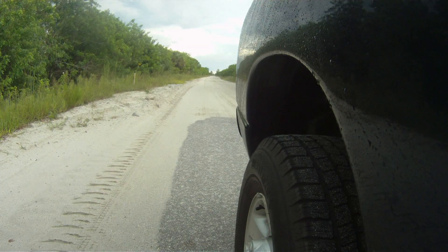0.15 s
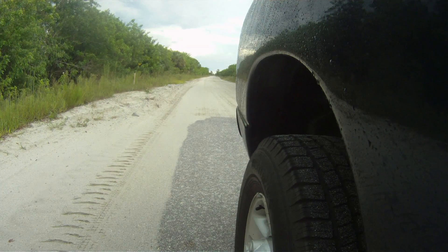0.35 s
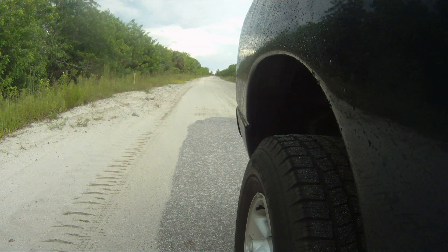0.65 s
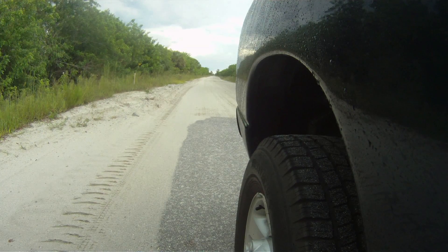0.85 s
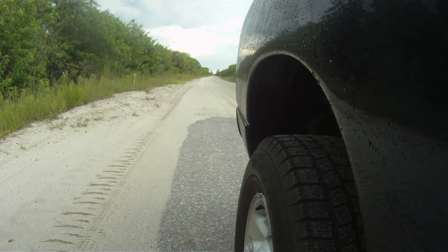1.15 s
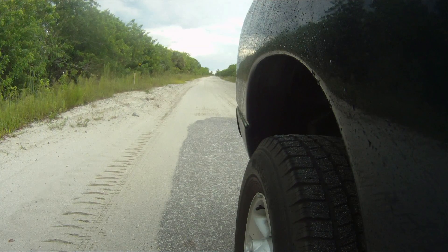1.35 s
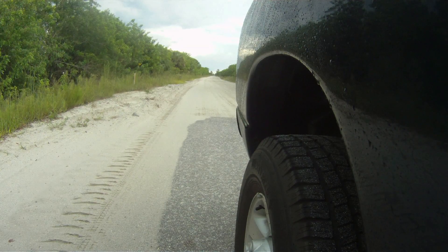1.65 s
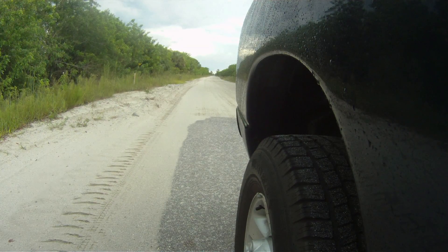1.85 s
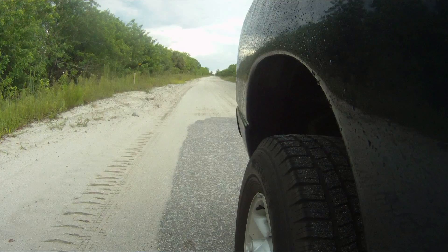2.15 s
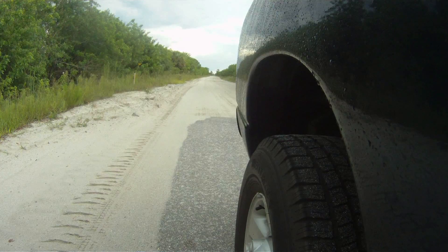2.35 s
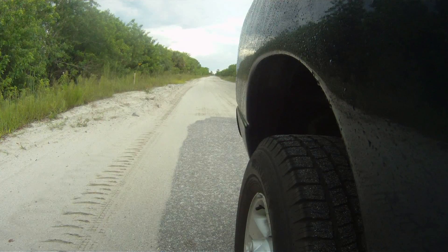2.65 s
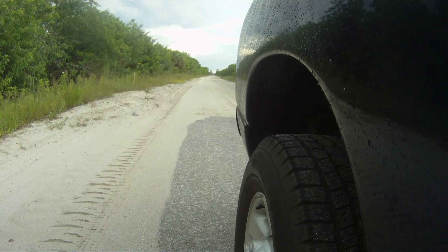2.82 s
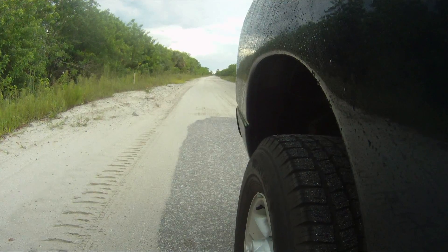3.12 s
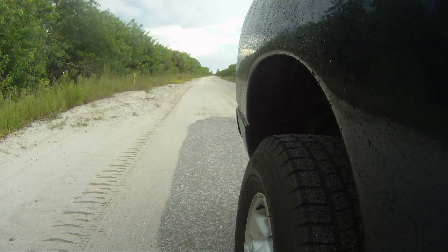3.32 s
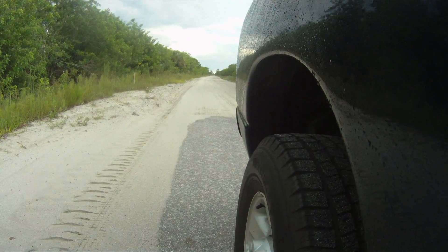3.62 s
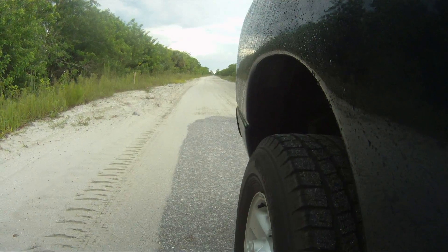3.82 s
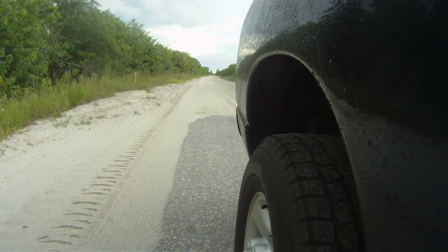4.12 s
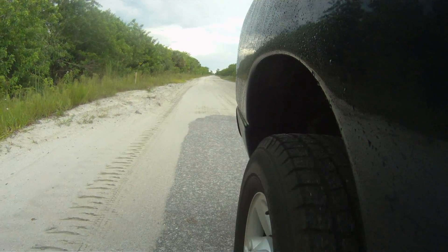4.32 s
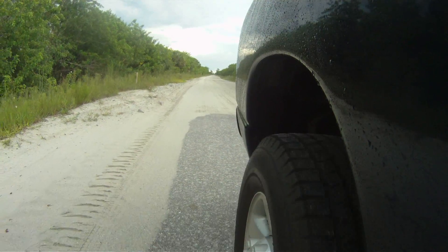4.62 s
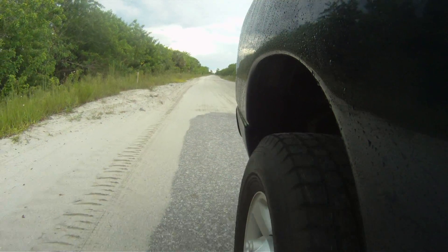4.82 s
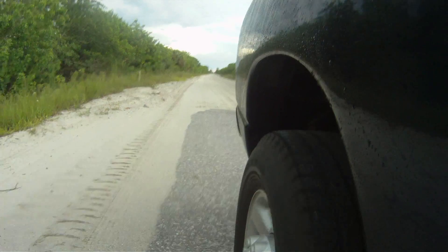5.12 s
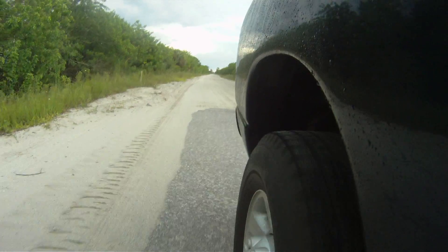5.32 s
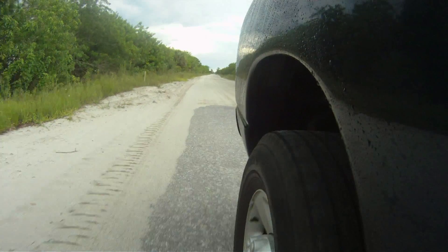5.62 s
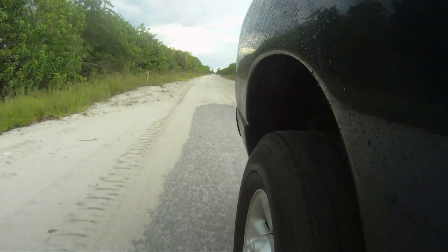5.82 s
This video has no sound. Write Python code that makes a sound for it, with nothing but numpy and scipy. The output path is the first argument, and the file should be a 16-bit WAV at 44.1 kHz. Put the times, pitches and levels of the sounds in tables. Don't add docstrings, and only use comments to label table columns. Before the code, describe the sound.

A six-cylinder diesel pickup idles on a rural road, with lumpy low exhaust and steady metallic knocking. Around three seconds a gear engages with soft deep thumps and a flurry of plastic ticks. The engine lugs, then revs up hard, booming loudly with a brief dip as the truck pulls away. The microphone sits close on the door panel in a closed housing, muffled and boxy with gritty highs.

```python
import sys
import numpy as np
from scipy import signal
from scipy.fft import rfft, irfft
from scipy.io import wavfile
from scipy.ndimage import uniform_filter1d

SR = 44100
rng = np.random.default_rng(int(sys.argv[2]) if len(sys.argv) > 2 else 0)


def linear_from_db(decibels):
    return 10 ** (np.asarray(decibels, float) / 20)


def persist_wave(psi):
    counts = np.round(np.clip(psi, -1, 1) * 32767).astype(np.int16)
    wavfile.write(sys.argv[1], SR, np.atleast_2d(counts).T)


N = 262836


def rms_one(x):
    return x / np.sqrt(np.mean(x ** 2) + 1e-20)


def in_time(rows):
    time_s, *columns = np.transpose(rows)
    return [np.interp(np.arange(N) / SR, time_s, column) for column in columns]


def drift(rate_hz, size=1):
    pole = np.exp(-80 * np.pi * rate_hz / SR)
    noise = rng.standard_normal(N // 40 + 2002)
    slow = signal.lfilter([1], [1, -2 * pole, pole ** 2], noise)[2000:]
    return np.interp(np.arange(0, N, size) / 40, np.arange(len(slow)), rms_one(slow))


def coloured_noise(spectrum):
    hz, level_db = np.transpose(spectrum)
    log_hz = np.log(np.arange(1, N // 2 + 2) * SR / N)
    gain = linear_from_db(np.interp(log_hz, np.log(hz), level_db))
    return rms_one(irfft(rfft(rng.standard_normal(N)) * gain, N))


def resonate(x, modes):
    out = 0
    for i, (hz, width_hz, level_db) in enumerate(modes):
        r = np.exp(-np.pi * width_hz / SR)
        poles = [1, -2 * r * np.cos(2 * np.pi * hz / SR), r * r]
        ringing = signal.lfilter([(1 - r * r) / 2, 0, (r * r - 1) / 2], poles, x)
        out = out + (-1) ** i * linear_from_db(level_db) * ringing
    return out


def sine(cycles, level_db):
    return np.sqrt(2) * linear_from_db(level_db) * np.cos(2 * np.pi * cycles)


def exhaust(cycle, speed_hz, rest_db):
    # time in seconds, level in dB rms.
    boom = [(0, -45), (1.5, -53), (2.35, -48), (2.6, -31), (3.15, -46), (3.3, -33), (3.45, -32),
            (4.2, -31.5), (4.5, -26), (4.72, -19.5), (4.82, -18), (4.87, -23.5), (4.96, -19.5),
            (5.1, -22.5), (5.22, -32), (5.36, -12.5), (5.55, -22), (5.68, -14)]
    # multiple of the cycle, level in dB at idle, in gear, throttle opening, full load.
    order_mix = [(3, 2.5, -11, -11, -8), (9, 6, -7, 8, -9), (10, 3, 0, -4, -11), (12, -12, 1.5, -9, 1),
                 (4, -15, -15, -16, -16), (4.5, -9, -9, -14, -14), (5, -20, -7, -13, -12),
                 (7, -14, -14, -22, -11), (8, -9, -20, -13, -25), (11, -10, -7, -14, -18),
                 (13, -18, -27, -14, -17), (14, -24, -23, -27, -22), (15, -14, -18, -5, -13),
                 (16, -15, -12, -15, -11), (17, -21, -20, -19, -20), (18, -8, -9, -8, -5),
                 (19, -16, -15, -10, -17), (20, -16, -17, -22, -19), (21, -5, -7, -13, -16),
                 (22, -23, -14, -18, -18), (24, -16, -12, -21, -13)]
    stage_s = [2.5, 3.2, 4.25, 4.45, 4.7, 4.9]
    # Hz, half width in Hz, level in dB.
    order_lifts = [(103.8, 6.2, 9), (189, 7.5, 2.5), (289.7, 6.6, 6.5), (348, 6.9, 3.5), (423, 27, -18)]
    # Hz, width in Hz, level in dB.
    door_panel = [(60.87, 1.95, 15.5)]
    start_cycles = -.22
    boom_db, = in_time(boom)
    firing = sine(6 * (cycle + start_cycles), boom_db)

    t = (np.arange(N) / SR)[::12]
    cycle, speed_hz, rest_db = cycle[::12], speed_hz[::12], rest_db[::12]
    high_orders = []
    for order in (23, *range(25, 34), *range(36, 55, 3)):
        base_db = -24 - 0.9 * (order - 24) + 11 * (order % 3 == 0)
        loaded_db = base_db + 6.5 * (order % 6 == 0)
        high_orders.append((order, base_db, base_db, base_db, loaded_db))
    others = np.zeros(len(t))
    for order, idle_db, gear_db, opening_db, full_db in list(order_mix) + high_orders:
        order = round(2 * order) / 2
        order_db = np.interp(t, stage_s, [idle_db, gear_db, gear_db, opening_db, opening_db, full_db])
        order_db = order_db + rest_db
        for hz, half_width_hz, lift_db in order_lifts:
            order_db += lift_db / (1 + ((order * speed_hz - hz) / half_width_hz) ** 2)
        if order in (3, 9, 10, 12):
            phase = order * start_cycles
        else:
            phase = rng.random() + .02 * drift(2, size=12)
            order_db += 2.2 * drift(6, size=12)
        others += sine(order * cycle + phase, order_db)
    return firing + resonate(firing, door_panel) + signal.resample_poly(others, 12, 1)[:N]


def knock(cycle, modes, cylinders_db, fall_db, steady, repeat, strike=0):
    firing = 6 * (cycle - .92 + 1)
    index = firing.astype(int)
    cylinder = index % 6
    strength_db = np.array(cylinders_db)[cylinder] + 1.1 * rng.standard_normal(400)[index]
    burst = linear_from_db(strength_db - fall_db * (firing - index)) + steady
    since_firing = np.arange(N) - np.searchsorted(index, index)
    pattern = rng.standard_normal((6, SR // 20))[cylinder, since_firing]
    grain = repeat * pattern + (1 - repeat) * rng.standard_normal(N)
    struck = grain + strike * (since_firing == 0)
    return resonate(rms_one(burst * struck), modes)


def clatter(cycle, knock_db, load_db):
    # Hz, width in Hz, level in dB.
    sump, pan, block = [(535.3, 14.4, -11), (656, 14.3, -16.5), (757, 14, -9.5), (820, 14, -11.5)], [(669, 18, 0)], [(958, 17.8, -5), (1034, 6.3, -3), (1094.4, 17.7, 2),
                                                   (1181.2, 15.4, -2.5), (1220.5, 11.4, -5.5),
                                                   (1490, 9, -18.5), (1708, 13.5, -16.5)]
    head, valves, injector = [(2203, 13.4, -10), (2299, 49, -11.5), (2438, 62, -8.5), (2600, 172, -18)], [(3030, 176, -26), (3650, 110, -24.5), (4350, 84, -36.5)], [(4590, 50, -30.5), (5034, 250, -30)]
    sump_cyl_db, block_cyl_db = [7, 0, -1, -4, -7, -6], [1, 0, -1, -1, 1, 0]
    head_cyl_db, valve_cyl_db = [-1, -2, -1, 3, 2, -1], [2, -1, 1, -1, 2, 0]
    injector_cyl_db = [5, 3.5, 0.5, -3, -1, -2]
    dull = knock(cycle, sump, sump_cyl_db, fall_db=4, steady=0.8, repeat=0.31)
    dull += knock(cycle, pan, sump_cyl_db, fall_db=6, steady=.3, repeat=.5, strike=32)
    dull += knock(cycle, block, block_cyl_db, fall_db=6, steady=0.64, repeat=0.17, strike=3.4)
    bright = knock(cycle, head, head_cyl_db, fall_db=3, steady=0.46, repeat=0.38)
    bright += knock(cycle, valves, valve_cyl_db, fall_db=2.5, steady=0.068, repeat=0.33)
    bright += knock(cycle, injector, injector_cyl_db, fall_db=3, steady=.05, repeat=.2)
    bright_db = 0.33 - 5.5 * np.tanh(load_db / 6.5)
    return linear_from_db(knock_db + 22.5) * (dull + linear_from_db(bright_db) * (bright + hiss()))


def jolts(rows, rise_db_s, fall_db_s):
    out = np.zeros(N)
    for crest_s, hz, level_db in rows:
        near = slice(int((crest_s - .3) * SR), int((crest_s + .5) * SR))
        t = np.arange(N)[near] / SR - crest_s
        out[near] += sine(hz * t, level_db - np.maximum(-rise_db_s * t, fall_db_s * t))
    return out


def gear_shudder():
    # crest in seconds, Hz, level in dB rms.
    cab = [(2.862, 41.8, -16), (2.988, 42.8, -17.5), (3.154, 40.9, -21.5), (3.26, 40.3, -28),
           (3.44, 39.5, -21.5), (2.94, 20.6, -17.5), (3.16, 20.4, -42)]
    # crest in seconds, Hz, level in dB rms.
    door = [(2.865, 50.6, -25), (2.988, 60.2, -14.5), (3.2, 63.7, -19.5), (3.39, 65, -47)]
    return jolts(cab, rise_db_s=176, fall_db_s=128) + jolts(door, rise_db_s=303, fall_db_s=106)


def door_drumming():
    # crest in seconds, Hz, level in dB rms.
    drumming = [(5.4, 61.6, -37), (5.62, 60.5, -19), (5.77, 53.6, -13.5), (5.87, 56, -14),
                (5.52, 30.5, -29), (5.67, 29, -34.5), (5.885, 28.5, -19)]
    return jolts(drumming, rise_db_s=100, fall_db_s=127)


def buzz(low):
    contact = uniform_filter1d(np.clip(low - 0.076, 0, .3), size=260)
    chatter = contact * rng.standard_normal(N)
    return linear_from_db(-21.5) * resonate(chatter, [(1680, 600, -14), (2970, 340, 11.0), (5450, 900, -2)])


def ticks():
    # time in seconds, peak in dB.
    clear_ticks = [(0.166, -28), (1.0355, -25), (1.4503, -22.5), (1.964, -25), (2.9028, -22.5),
                   (2.9472, -39), (2.9831, -36), (3.0076, -22), (3.0646, -23), (3.0824, -20), (3.1053, -29),
                   (3.1308, -22), (4.782, -28), (4.8324, -21), (4.89, -17), (4.9077, -23), (5.0235, -16),
                   (5.0404, -21), (5.187, -28), (3.0357, -37), (3.1787, -32)]
    faint_per_s, faint_db = 4, -42
    faint = rng.random(N) < faint_per_s / SR
    clicks = faint * linear_from_db(faint_db + 3 * rng.standard_normal(N)) + 1e-18
    for time_s, peak_db in clear_ticks:
        clicks[round(time_s * SR)] = linear_from_db(peak_db)
    rounded_edge = np.hanning(30) * np.cos(2 * np.pi * 3500 * np.arange(30) / SR)
    clicks = signal.lfilter(rounded_edge, 1, clicks)
    clicks = resonate(clicks, [(3400, 2500, 9)])
    return resonate(clicks, [(3060, 400, -3), (3650, 500, -8), (5000, 1500, -13)])


def roar(speed_hz, load_db):
    # Hz, level in dB per Hz.
    roar_spectrum = [(15, -16), (25, -9), (70, -0.5), (130, -20), (200, -9.5), (330, -12), (400, -32),
                     (500, -37)]
    idle_speed_hz, db_per_octave = 6.4, -0.5
    roar_db = -45.5 + 0.86 * load_db + db_per_octave * np.log2(speed_hz / idle_speed_hz)
    return linear_from_db(roar_db + 2.5 * drift(6.1)) * coloured_noise(roar_spectrum)


def hiss():
    # Hz, level in dB per Hz.
    hiss_spectrum = [(180, -27), (300, -4), (436, -12.5), (520, 0), (659, -3.5), (868, -6), (1110, -12),
                     (1340, -9), (2030, -10), (2450, -11), (2810, -27), (4990, -24), (5950, -38.5),
                     (7740, -74), (13100, -120)]
    return linear_from_db(-29 + 0.62 * drift(5)) * coloured_noise(hiss_spectrum)


def scene():
    # time in seconds, four-stroke cycles per second.
    speed_rows = [(0, 6.47), (1.1, 6.495), (2.1, 6.465), (2.6, 6.44), (2.88, 6.08), (3.15, 5.93),
                  (3.5, 6.14), (4.0, 6.22), (4.35, 6.33), (4.72, 6.92), (4.8, 7.6), (4.9, 9.4),
                  (5.0, 10.25), (5.14, 10.75), (5.24, 11.22), (5.5, 11.68), (5.75, 12.0), (5.96, 12.11)]
    # time in seconds, level in dB.
    load_rows = [(0, -34), (2.75, -33.5), (2.9, -32), (3.1, -29.5), (4.4, -28.5), (4.65, -26.5),
                 (4.8, -22.5), (4.93, -17), (4.99, -14.5), (5.06, -27.5), (5.12, -32), (5.19, -32),
                 (5.22, -26.5), (5.43, -21), (5.57, -16.5), (5.72, -19), (5.9, -19), (5.96, -16.5)]
    speed_hz, = in_time(speed_rows)
    knock_db, = in_time(load_rows)
    load_db = knock_db + 35
    cycle = np.cumsum(speed_hz) / SR

    shudder = gear_shudder()
    shaking = uniform_filter1d(np.abs(shudder), size=3000)
    shaken_db = 20 * np.log10(1 + linear_from_db(7.5) * shaking)
    low = exhaust(cycle, speed_hz, rest_db=-39 + 0.81 * load_db + shaken_db)
    low += shudder + door_drumming() + roar(speed_hz, load_db)
    mix = low + clatter(cycle, knock_db, load_db) + ticks() + buzz(low)
    return np.tile(mix, (2, 1))


def roll_off(x):
    return signal.sosfilt(signal.butter(12, 15200, fs=SR, output="sos"), x)


def record(dry):
    coarse = signal.resample_poly(dry[0], 40, 147)
    held = signal.resample_poly(np.repeat(coarse, 4), 147, 160)[:N]
    held = np.pad(held, (0, N - len(held)))
    limited = 1.186 * np.tanh(held / 1.11)
    power = uniform_filter1d(limited ** 2, 2048)
    loud = uniform_filter1d(1.0 * (power > linear_from_db(-26)), 512)
    grain = linear_from_db(-38.0) * loud * limited * drift(140)
    return roll_off(limited + grain * [[1], [-1]])


dry = scene()
out = record(dry)
persist_wave(out)
```